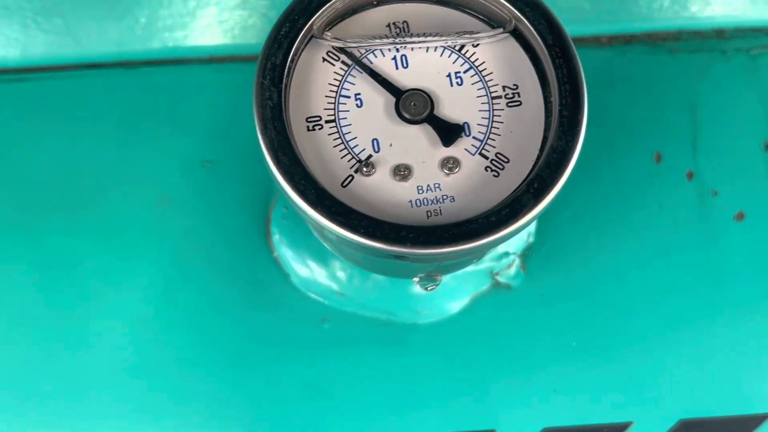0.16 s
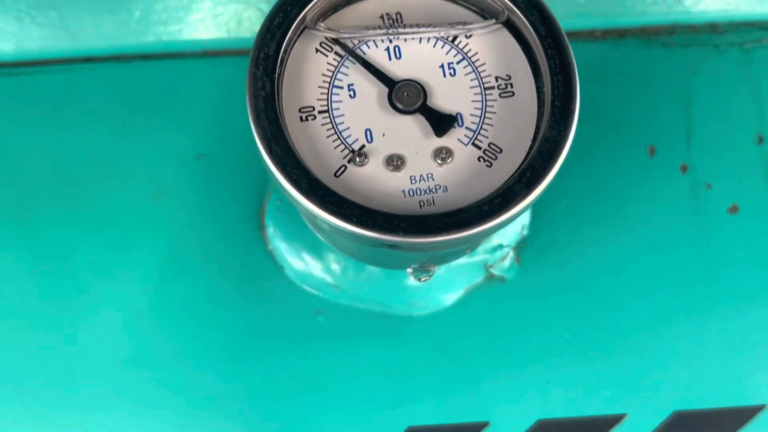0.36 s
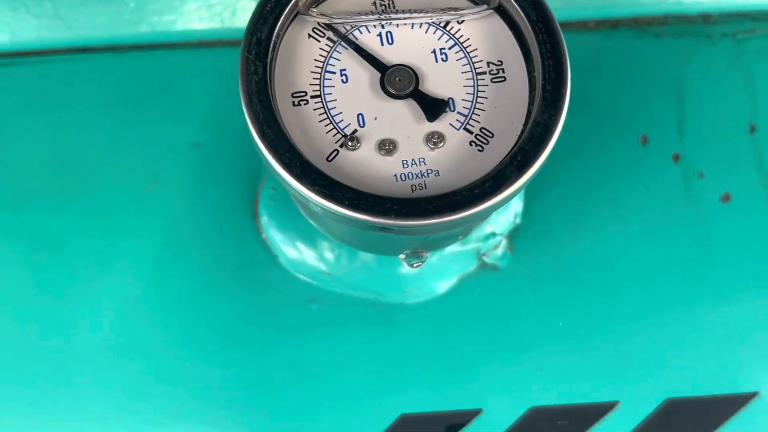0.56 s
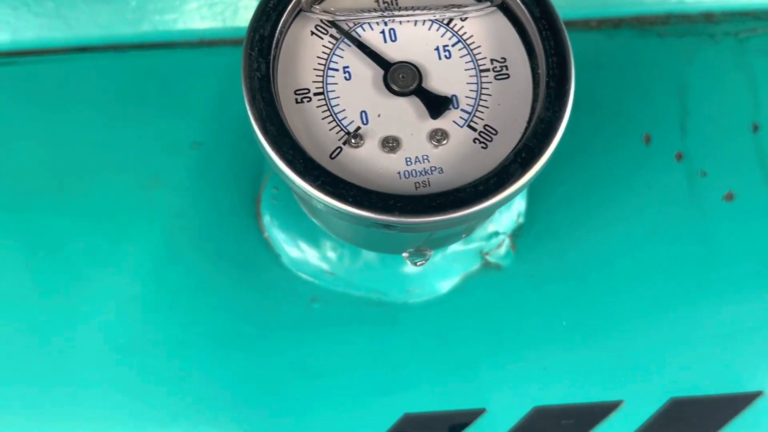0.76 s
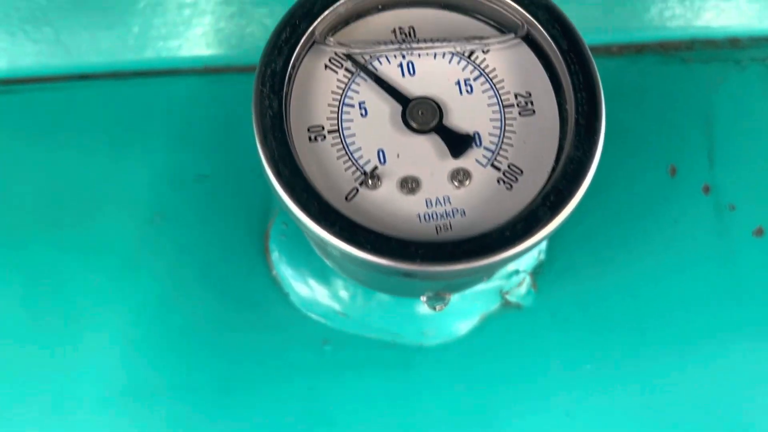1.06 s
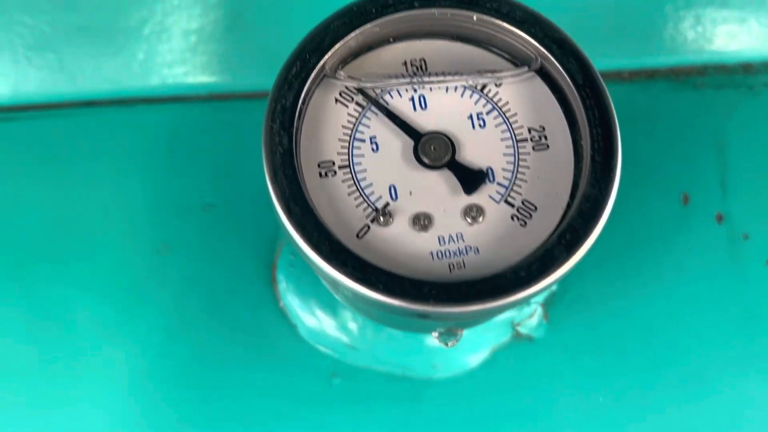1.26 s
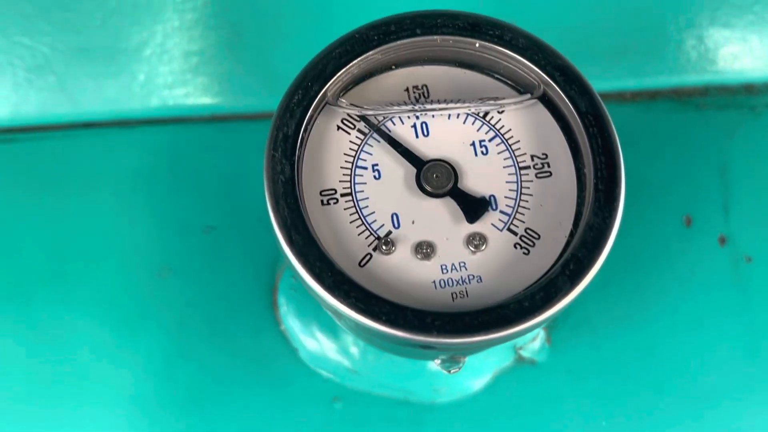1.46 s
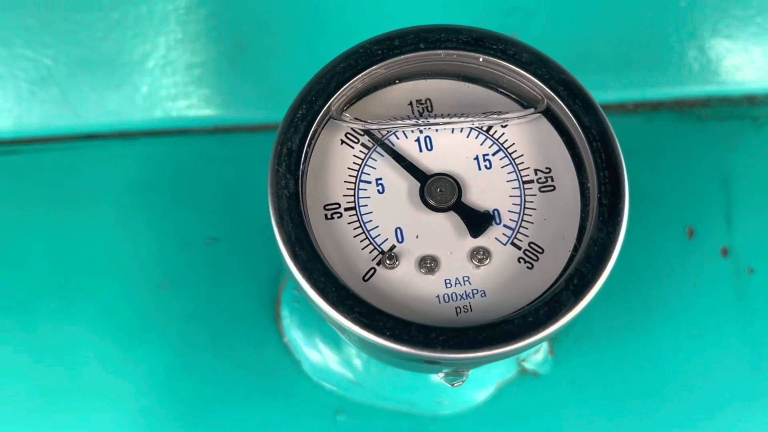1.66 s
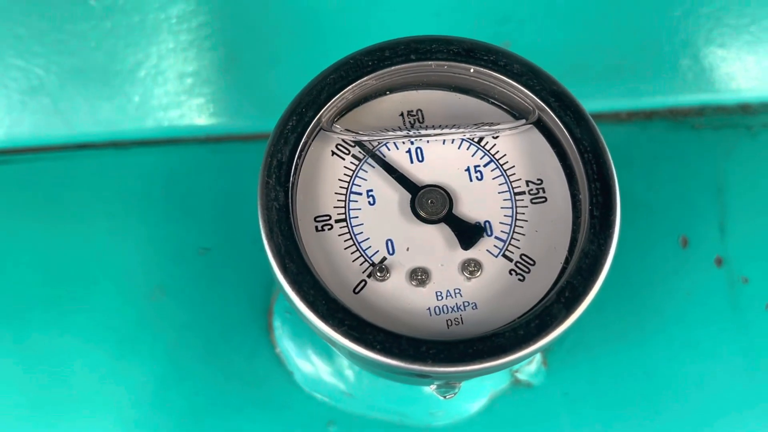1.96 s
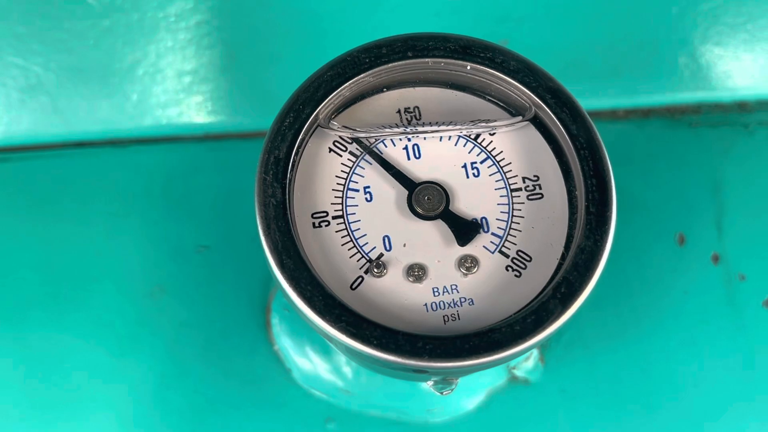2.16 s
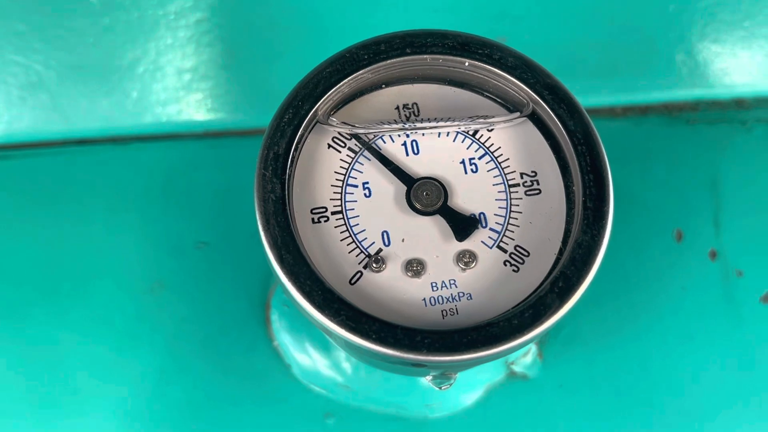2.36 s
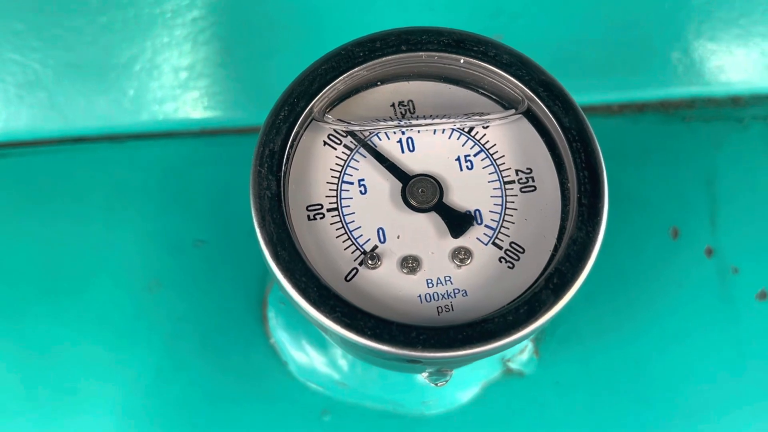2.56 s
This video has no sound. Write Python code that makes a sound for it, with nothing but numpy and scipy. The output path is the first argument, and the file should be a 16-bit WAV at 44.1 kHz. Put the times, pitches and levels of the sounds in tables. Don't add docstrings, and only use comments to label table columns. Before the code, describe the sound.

A rotary screw air compressor drones close by in a plant room, whining tones over motor hum, rumble and hiss; faint low bumps, then a valve puff and thump bring a louder, hissier pulsation.

```python
import sys
import numpy as np
from scipy import signal
from scipy.fft import rfft, irfft
from scipy.io import wavfile
from scipy.ndimage import map_coordinates

SR = 44100
rng = np.random.default_rng(int(sys.argv[2]) if len(sys.argv) > 2 else 0)


def put_to_file(sound):
    columns = np.atleast_2d(sound).T
    safe = np.clip(columns, -1, 1)
    whole_steps = np.round(safe * 32767)
    wavfile.write(sys.argv[1], SR, whole_steps.astype(np.int16))


def voltage_ratio(level):
    return 10 ** (np.asarray(level, float) / 20)


N = 119511
T = np.arange(N) / SR
HZ = np.maximum(np.arange(N // 2 + 1) * SR / N, 1)

# time in seconds, mesh rate in Hz.
MESH = [
    (0, 177.07),
    (2.17, 177.07),
    (2.26, 178.2),
    (2.4, 178.36),
    (2.71, 178.36),
]
# time in seconds, level in dB against full.
SWELL = [
    (0, -40),
    (2.12, -40),
    (2.17, -11),
    (2.24, -6),
    (2.32, -4),
    (2.42, -3),
    (2.52, -.8),
    (2.6, 0),
    (2.71, 0),
]


def curve(rows):
    return np.interp(T, *np.transpose(rows))


def at_hz(points):
    hz, value = np.transpose(points)
    return np.interp(np.log(HZ), np.log(hz), value)


def passing(centre_s, width_s):
    return np.exp(-((T - centre_s) / width_s) ** 2)


def drift(rate, count):
    steps = np.arange(int(T[-1] * rate) + 3)
    chance = rng.standard_normal((count, len(steps)))
    where = np.meshgrid(np.arange(count), T[::64] * rate, indexing="ij")
    return map_coordinates(chance, where, order=3).repeat(64, axis=1)[:, :N]


def ripple():
    return np.interp(HZ / 28, np.arange(700), rng.standard_normal(700)) * 1.22


def coloured(db):
    # frequency in Hz, level in dB.
    side_level = [(40, -8), (200, -19), (500, -6), (1200, -1), (2500, -1), (3500, -6), (5000, -32),
                  (13000, -14)]
    ripple_db, steered = 2.2, .85
    colour = voltage_ratio(db + ripple_db * ripple() * np.minimum(HZ / 600, 1)) * np.sqrt(SR / 2)
    mid, side = rfft(rng.standard_normal((2, N))) * colour
    steer = (ripple() + 1j * ripple()) / np.sqrt(2)
    side = (steered * steer * mid + np.sqrt(1 - steered ** 2) * side) * voltage_ratio(at_hz(side_level))
    return irfft(np.array([mid + side, mid - side]), N)


def jet(voices):
    colour = 0
    for hz, width, db in voices:
        colour = colour + voltage_ratio(db) * np.sqrt(SR / 2 / width) * np.exp(-2 * ((HZ - hz) / width) ** 2)
    return irfft(rfft(rng.standard_normal(N)) * colour, N)


def tones(phase, level, pan_db):
    start = rng.uniform(0, 2 * np.pi, (len(phase), 1))
    skew = .35 * rng.standard_normal((len(phase), 1))
    channels = []
    for side in (1, -1):
        lines = level * voltage_ratio(side * pan_db / 2) * np.sin(phase + start + side * skew / 2)
        channels.append(np.sqrt(2) * np.sum(lines, axis=0))
    return np.array(channels)


def standing(multiple):
    # multiple of mesh rate, centre in seconds, width in seconds, gain in dB.
    peaks_and_nulls = [(1, 2.24, .03, 5), (1.52, .15, .25, -7), (1.52, 2.4, .03, 12), (1.52, 2.2, .04, 4),
                       (2, 2.1, .04, -3), (3, 2.27, .07, 9), (3, 2.66, .03, 3), (3.17, 2.22, .04, 14),
                       (3.17, 2.4, .02, 5), (3.17, 2.5, .04, 6), (4, 2.28, .04, 6), (4, 2.37, .05, 9),
                       (4, 2.49, .015, -14), (4, 2.6, .08, -3), (4, 2.64, .02, -10), (5, 2.27, .08, 6),
                       (5, 2.65, .04, -7), (6, 2.39, .025, -8), (6, 2.45, .025, 3), (6, 2.53, .025, -11),
                       (6, 2.62, .06, 2), (8, 2.41, .035, 8), (12.75, 2.31, .07, 7), (13.5, 2.33, .08, 6),
                       (13.75, 2.3, .08, -2), (13.75, 2.61, .03, 4), (14, 2.14, .04, 4), (15, 2.3, .06, -5),
                       (15, 2.47, .1, 4), (15, 2.7, .07, -14), (15.25, 2.31, .06, 5), (18.75, 2.22, .04, 8)]
    gain_db = 0
    for line, centre_s, width_s, db in peaks_and_nulls:
        gain_db = gain_db + db * passing(centre_s, width_s) * (abs(multiple - line) < .03)
    return voltage_ratio(gain_db)


def mesh_phase():
    return 2 * np.pi * np.cumsum(curve(MESH)) / SR


def loaded():
    valve_s, fade_s = 2.22, .03
    return .5 - .5 * np.tanh((T - valve_s) / fade_s)


def blow_off():
    open_s, rise_s = 2.43, .05
    return .5 + .5 * np.tanh((T - open_s) / rise_s)


def surge(width_s):
    return passing(2.3, width_s)


def air():
    # frequency in Hz, level in dB per Hz.
    roar_level = [(150, -70), (215, -46.5), (250, -49.5), (300, -53.5), (460, -64.5), (570, -63.5),
                  (700, -64.5), (850, -68), (1300, -65.5)]
    # frequency in Hz, level in dB per Hz.
    hiss_level = [(1600, -76), (2300, -73.5), (3000, -76.5), (3500, -83), (5500, -84.5), (8500, -80.5),
                  (11000, -82.5), (12800, -110.5)]
    # frequency in Hz, level in dB per Hz.
    rumble_level = [(20, -55), (35, -61), (55, -45), (100, -45.5), (150, -50), (220, -55.5), (400, -93.5)]
    # time in seconds, rumble gain in dB.
    buffet = [(0, -5), (.3, -3), (.45, -.5), (1.85, 1.5), (2.1, 1), (2.26, 3), (2.38, 6), (2.46, 1),
              (2.55, 0), (2.71, 3)]
    split = 1 / (1 + (HZ / 1480) ** 40)
    roar_band = split / (1 + (130 / HZ) ** 4)
    roar = coloured(at_hz(roar_level) + 20 * np.log10(roar_band + 1e-9))
    roar = roar * voltage_ratio(4 * voltage_ratio(curve(SWELL)) ** 2 + 4 * surge(width_s=.18))
    throb = 1 + .3 * np.sin(mesh_phase())
    hiss = coloured(at_hz(hiss_level) + 20 * np.log10(1 - split + 1e-9))
    hiss = hiss * voltage_ratio(4 * blow_off() + .4 * drift(6.53, count=1))
    rumble = coloured(at_hz(rumble_level)) * voltage_ratio(curve(buffet) + 1.5 * drift(16.0, count=1))
    return roar * throb + hiss + rumble


def motor():
    # frequency in Hz, level in dB, left over right in dB.
    motor_lines = [(53.2, -35, 0), (269.5, -30, 1), (324.6, -43, 0), (330.6, -41, 2), (359.9, -41, 1),
                   (389.5, -48, 0), (569.6, -49, -2), (969.9, -51, 1), (1087.9, -56, 2), (1207.9, -51, 4),
                   (1447.9, -47, -4), (6260.1, -68, 0)]
    hz, db, pan_db = np.array(motor_lines).T[:, :, None]
    waver_hz = 2.5 * drift(6.0, count=len(hz)) * (abs(hz - 270) < 10)
    phase = 2 * np.pi * np.cumsum(hz + waver_hz, axis=1) / SR
    level = voltage_ratio(db - 6 * (1 - loaded())) * standing(hz / MESH[0][1])
    return tones(phase, level, pan_db)


def thumps():
    # start in seconds, peak in dB, frequency in Hz.
    pushes = [(.36, -19, 80), (.76, -19, 75), (.9, -19, 70), (1.234, -15, 91), (1.601, -19, 67),
              (1.904, -11, 100), (1.935, -12, 60), (1.992, -10, 78), (2.16, -4, 62), (2.225, -10, 68),
              (2.29, -15, 75), (2.34, -10, 52), (2.388, -9, 120), (2.416, -14, 50), (2.6, -17, 60),
              (2.64, -16, 100)]
    start_s, db, hz = np.array(pushes).T[:, :, None]
    cycles = np.maximum(T - start_s, 0) * hz
    return np.sum(voltage_ratio(db) * np.sin(2 * np.pi * cycles) * np.exp(-cycles / 1.1), axis=0)


def valve():
    # centre in Hz, width in Hz, level in dB.
    puff_voices = [(1700, 1200, -35), (2600, 1400, -37), (4100, 1500, -44), (5400, 1100, -38),
                   (7600, 2200, -38), (11300, 1600, -52)]
    # centre in Hz, width in Hz, level in dB.
    rush_voices = [(1750, 700, -46), (150, 80, -28)]
    # centre in Hz, width in Hz, level in dB.
    blow_off_voices = [(4050, 1400, -46), (5600, 1800, -66)]
    puff_s, rise_s, fall_s = 2.146, .011, .015
    shape = np.exp(-np.where(T < puff_s, (puff_s - T) / rise_s, (T - puff_s) / fall_s))
    sputter = voltage_ratio(2.2 * drift(250, count=1)[0])
    puff = shape * sputter * jet(puff_voices)
    rush = passing(2.3, .14) * jet(rush_voices)
    return puff + rush + blow_off() * jet(blow_off_voices)


def high_orders():
    order = np.arange(82, 176, 2)[:, None]
    level = voltage_ratio(-71 + 3 * rng.standard_normal(order.shape))
    start = rng.uniform(0, 2 * np.pi, order.shape)
    return np.sum(level * np.sin(order / 4 * mesh_phase() + start), axis=0)


def rotor(table, lobes, steepen):
    order, old_db, new_db, pan_db = np.array(table, float).T[:, :, None]
    hz = order * MESH[0][1] / lobes
    slip_turns = .3 * np.tanh((T - 2.21) / .05) * (hz < 600)
    phase = order / lobes * mesh_phase() - 2 * np.pi * slip_turns
    wobble = drift(9.0, count=len(order))

    break_in_s = 2.29 + .018 * hz / MESH[0][1]
    late = np.where(hz > 450, .65 + .35 * np.tanh((T - break_in_s) / .02), 1)
    steepness = np.maximum(steepen * order * (order % 3 == 0), 1)
    gas = late * voltage_ratio(curve(SWELL) * steepness + 9 * surge(width_s=.09) * (hz < 200))
    casing = (1 - loaded()) * voltage_ratio(curve(SWELL) / 4)
    growth = np.where(hz < 1500, gas, casing)

    old = voltage_ratio(old_db + (1.3 + 1.3 * wobble) * np.minimum(hz / 900, 1)) * loaded()
    new = voltage_ratio(new_db + (2 + .8 * wobble) * np.minimum(hz / 1500, 1)) * growth
    return tones(phase, np.hypot(old, new) * standing(order / lobes), pan_db)


def scene():
    # multiple of mesh rate, loaded dB, unloaded dB, left over right in dB.
    lobe_lines = [(1, -28, -23, 1), (2, -23, -11, 4), (3, -37, -25, 5), (4, -31.5, -31.5, -2),
                  (5, -52, -40, -9), (6, -47, -28, 1), (7, -43, -39, 4), (8, -48, -39, -5),
                  (10, -60, -55, -8), (11, -54, -69, 0), (12, -52, -57, -2), (14, -42, -59, 2),
                  (15, -54, -40, -2), (16, -56, -49, -4), (18, -66, -54, 1)]
    # multiple of its turn rate, loaded dB, unloaded dB, left over right in dB.
    male_lines = [(21, -63, -61, 2), (22, -54, -46, 0), (26, -67, -65, -2), (34, -62, -62, -9),
                  (42, -53, -59, -4), (46, -60, -67, -2), (47, -77, -75, 4), (50, -45, -43, -3),
                  (51, -44, -48, -2), (53, -62, -47, -5), (54, -54, -46, -1), (55, -59, -42, 9),
                  (57, -59, -70, -1), (58, -52, -49, 1), (59, -49, -46, -3), (61, -50, -47, -3),
                  (62, -54, -71, -1), (63, -52, -53, -1), (65, -50, -59, -2), (66, -59, -58, -3),
                  (67, -62, -62, -2), (69, -69, -67, 5), (70, -53, -57, -2), (71, -55, -69, -4),
                  (74, -59, -60, 1), (75, -58, -48, 1), (78, -71, -69, -1), (79, -66, -74, 0)]
    # multiple of its turn rate, loaded dB, unloaded dB, left over right in dB.
    female_lines = [(7, -38, -31, 3), (8, -35, -56, 2), (13, -43, -41, 0), (14, -46, -35, -2),
                    (16, -51, -49, 9), (17, -49, -47, 1), (19, -45, -33, -6), (20, -52, -39, 0),
                    (28, -64, -47, 3), (32, -62, -45, 4), (35, -49, -52, 2), (40, -66, -48, -4),
                    (49, -61, -44, 4), (71, -70, -52, -2), (74, -58, -56, -3), (77, -56, -59, -4),
                    (83, -55, -64, 0), (85, -58, -58, -3), (86, -52, -59, -1), (89, -59, -61, -5),
                    (91, -58, -60, -2), (92, -54, -59, -2), (95, -56, -59, -1), (100, -60, -63, -1),
                    (104, -61, -68, -1), (110, -68, -66, 1)]
    background = air() + motor() + thumps() + valve()
    meshing = rotor(lobe_lines, lobes=1, steepen=.5)
    male = rotor(male_lines, lobes=4, steepen=0) + high_orders()
    female = rotor(female_lines, lobes=6, steepen=0)
    return background + meshing + male + female


def roll_off(x):
    return signal.sosfilt(signal.butter(12, 12640, fs=SR, output="sos"), x)


def record(dry):
    # frequency in Hz, turn in radians.
    port_turn = [(8880, 0), (9300, 1.7), (10250, 3.14), (11400, 5.3), (12000, 6.283)]
    ceiling, low_cut_hz = .93, 28
    top_db = -6 * np.maximum(HZ - 11400, 0) / 1000 - 6 * (HZ > 12400)
    soft = ceiling * 2 * np.tanh(dry / ceiling / 2)
    left, right = rfft(soft) * voltage_ratio(top_db) / (1 + (low_cut_hz / HZ) ** 4)
    right = right * np.exp(-1j * np.interp(HZ, *np.transpose(port_turn)))
    return roll_off(irfft(np.array([left, right]), N))


dry = scene()
out = record(dry)
put_to_file(out)
```